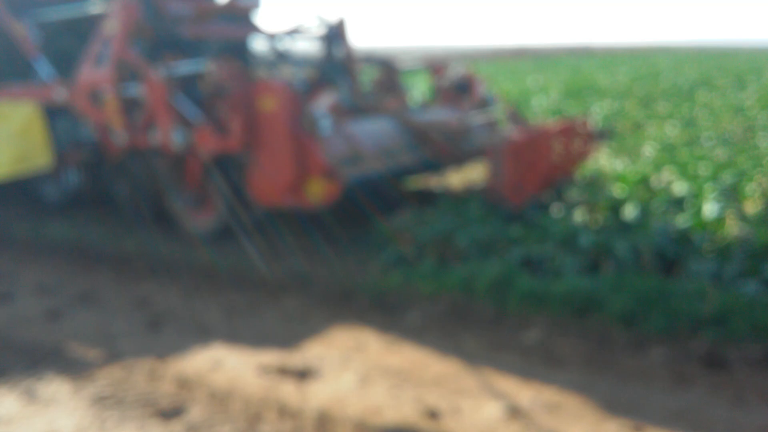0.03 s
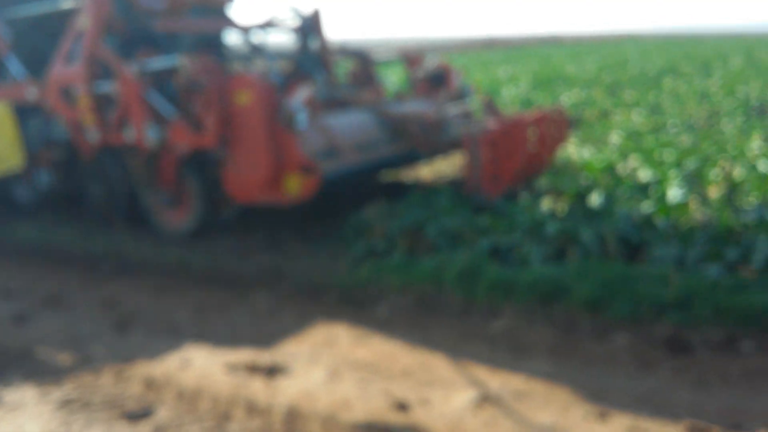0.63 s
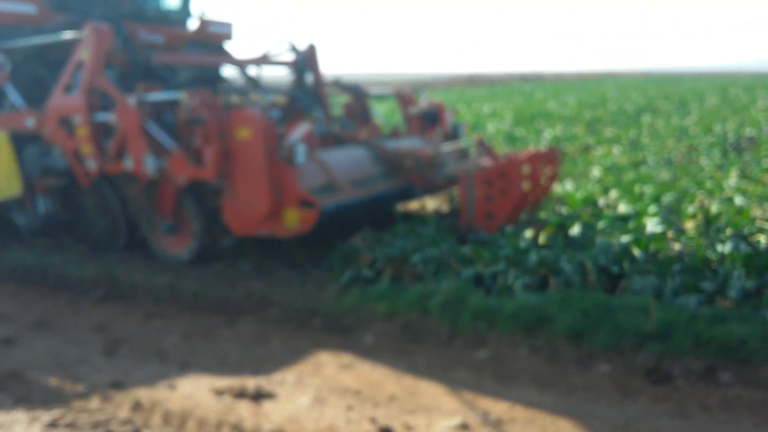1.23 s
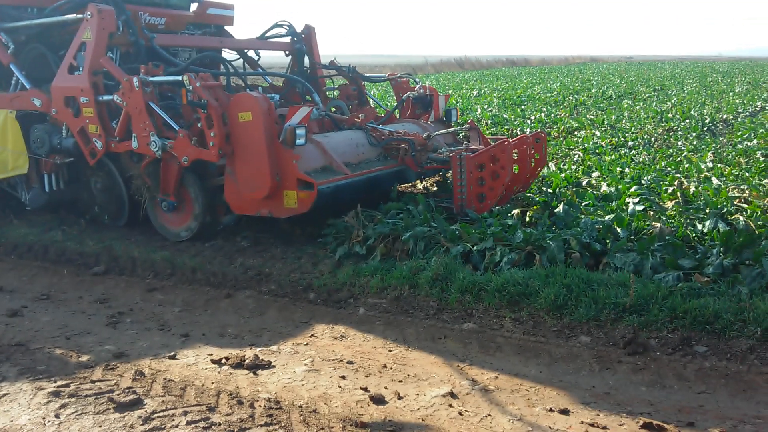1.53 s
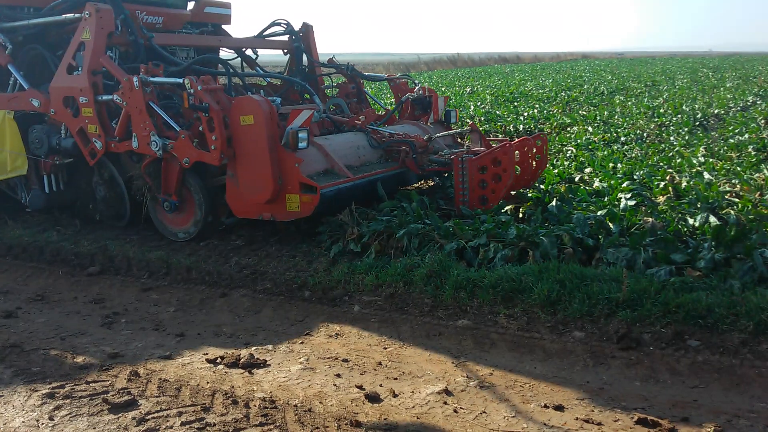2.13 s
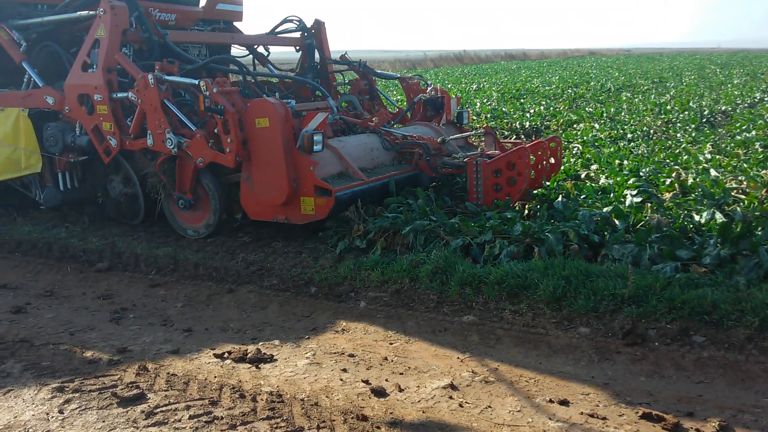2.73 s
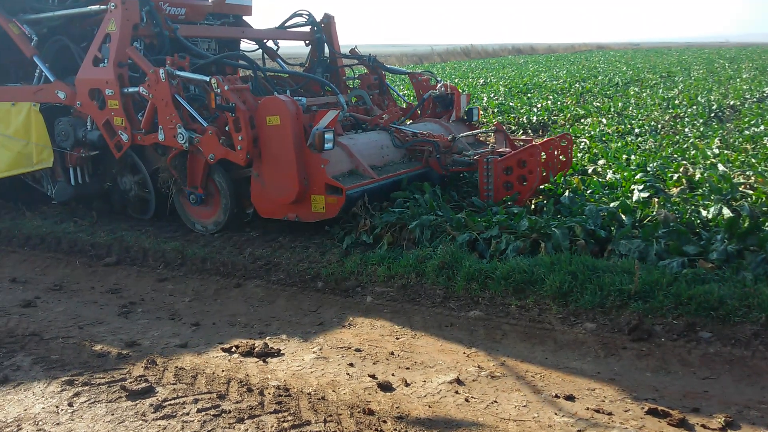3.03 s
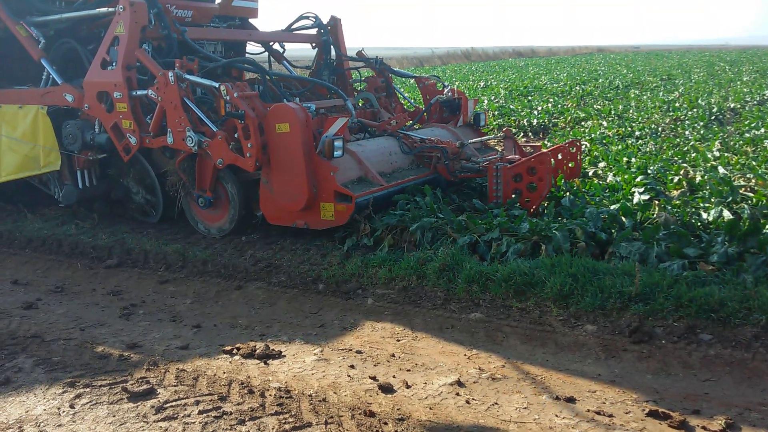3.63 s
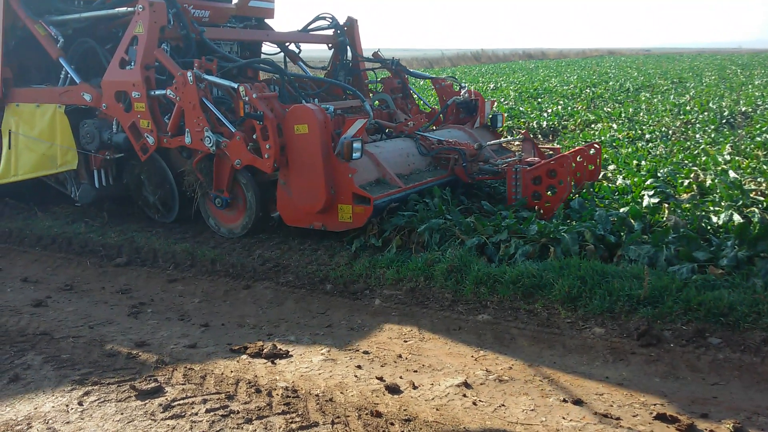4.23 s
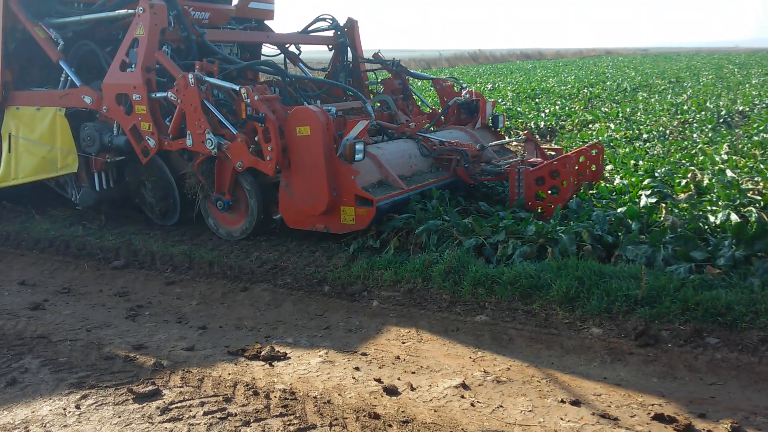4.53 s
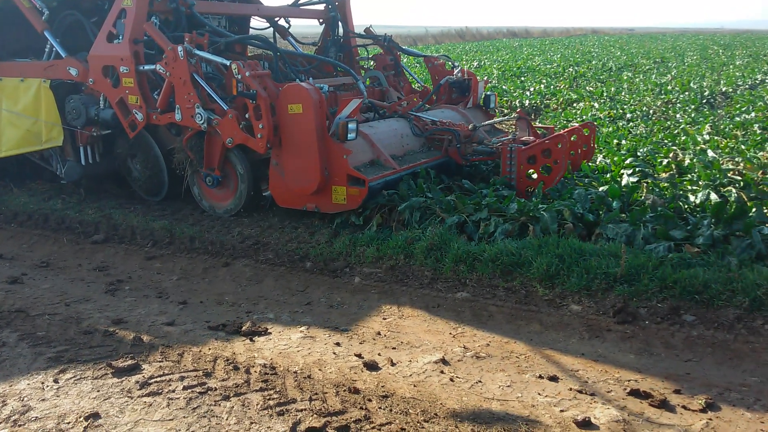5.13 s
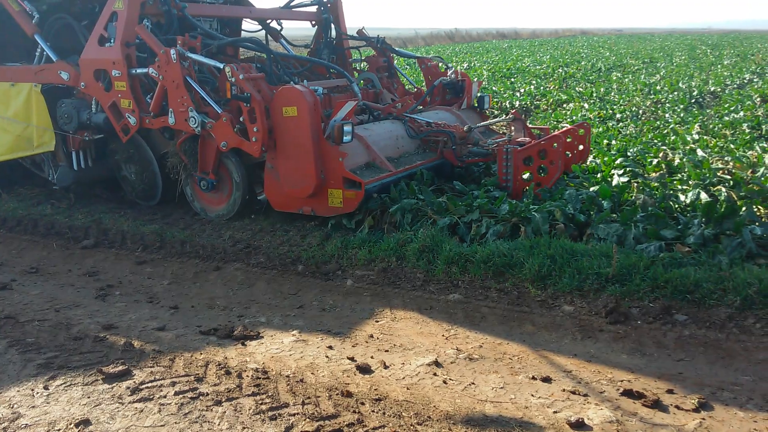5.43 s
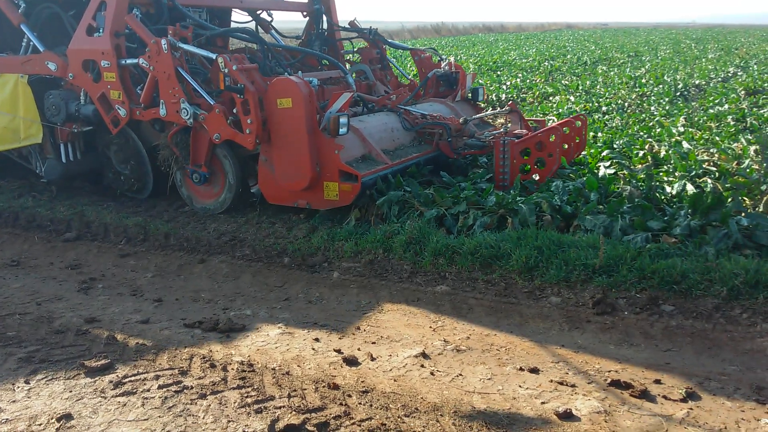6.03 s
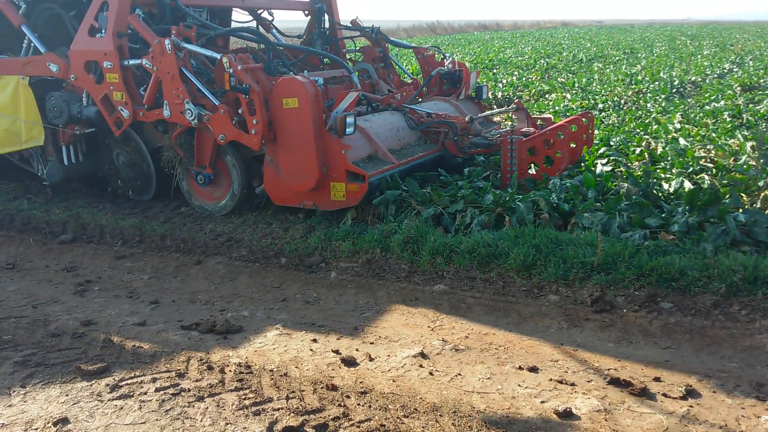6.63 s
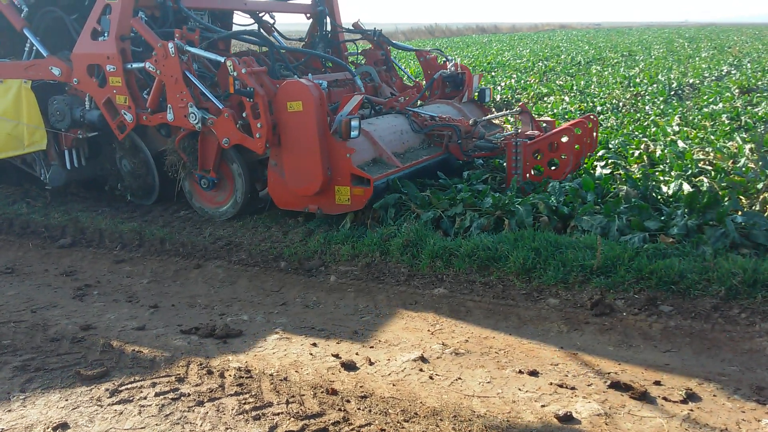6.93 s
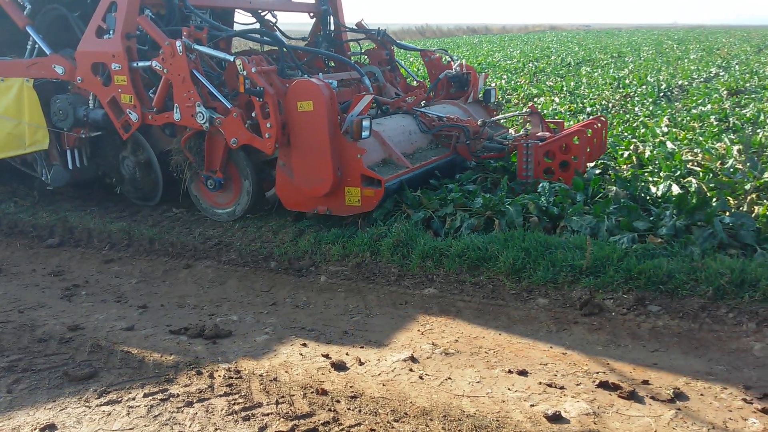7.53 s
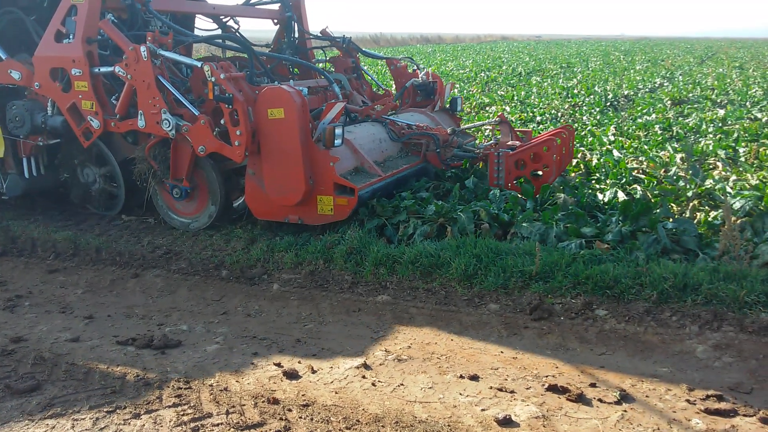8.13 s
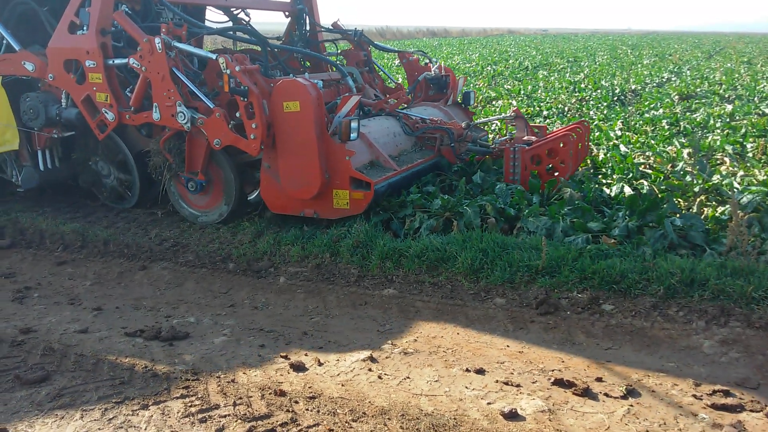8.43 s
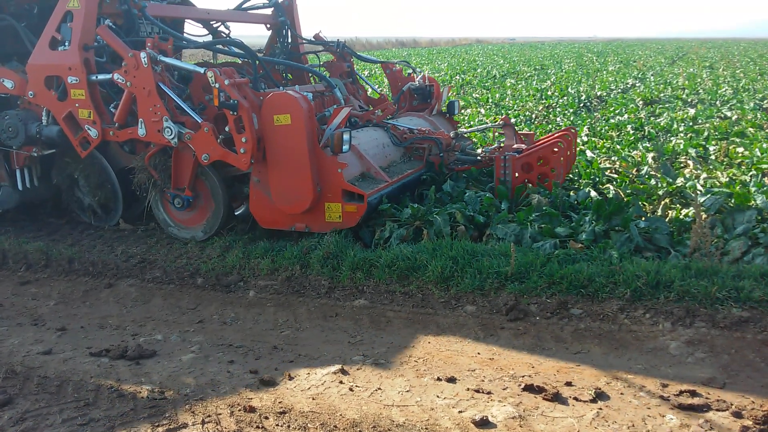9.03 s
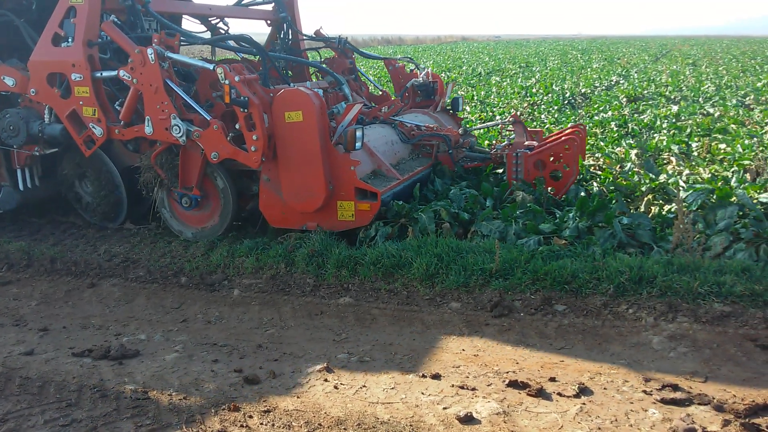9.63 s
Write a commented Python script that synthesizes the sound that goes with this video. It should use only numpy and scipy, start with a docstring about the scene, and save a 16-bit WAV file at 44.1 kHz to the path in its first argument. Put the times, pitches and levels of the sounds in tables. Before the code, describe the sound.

At about 0.4 seconds the microphone clicks once, and a beet harvester a few metres away fades up in two steps, reaching full level near 2 seconds. Its diesel engine and leaf rotor drone steadily over a deep rumble of steel panels, with rattling chains, a hydraulic whine and a fan whine that swells and fades. A faint, thin bearing squeal sinks slightly and ends by 2.5 seconds. Light metal clinks dot the first five seconds. One stone clanks just after the click, and a gritty cluster follows from 2 to 3.3 seconds, with more between 5 and 6 and between 7 and 8. From about 2 seconds, tumbling beets and hissing soil and leaves build in surges, strongest near 5.5, 7.4 and 9.3 seconds. The machine runs on until the end, near 10 seconds. Nearly everything is on the left; the right side is very faint.

```python
"""Beet harvester at the field's edge

A harvester creeps along a few metres away, fading up over the first two seconds. Its six-cylinder
diesel, leaf rotor, fan and hydraulic pump hum over the rumble of the steel body; chains rattle and
a dry bearing sings briefly. Stones clank on the lifting gear, then more and more beets, soil and
leaves pour through it and load the drives. The microphone clicks once at the start, and its right
side is nearly dead."""
import sys
import numpy as np
from scipy import signal
from scipy.fft import rfft, irfft, next_fast_len
from scipy.io import wavfile
from scipy.ndimage import uniform_filter1d

SR = 44100
rng = np.random.default_rng(int(sys.argv[2]) if len(sys.argv) > 2 else 0)


def to_wav(s):
    """Save 16-bit WAV."""
    ch = np.atleast_2d(s).T  # columns
    pcm = np.round(np.clip(ch, -1, 1) * 32767)  # PCM
    wavfile.write(sys.argv[1], SR, pcm.astype(np.int16))


N = 431738
TIME = np.arange(N) / SR
SIZE = next_fast_len(N, real=True)
FREQ = np.maximum(np.fft.rfftfreq(SIZE, 1 / SR), 1)

# surges of crop: t/s, tumbling beets level/dB, soil and leaf spray level/dB
CROP_SURGES = [(1.7, -46.5, -57.5), (2.4, -46, -56), (2.7, -45.5, -51.5), (3.1, -44.5, -50),
               (3.35, -47, -53.5), (3.72, -44.5, -47), (4.1, -42, -47), (4.25, -41, -43.5),
               (4.38, -44, -49), (5.05, -43.5, -47), (5.4, -37.5, -44), (5.65, -38, -43.5),
               (6.3, -41, -43.5), (6.8, -42.5, -47), (7.25, -39.5, -45), (7.43, -36, -40.5),
               (7.7, -37.5, -41.5), (7.95, -40.5, -44), (8.21, -38.5, -40), (8.35, -41, -45),
               (8.8, -39, -44), (9.1, -39.5, -43), (9.31, -35, -41.5), (9.79, -38.5, -42)]
# tone colour of a hard knock on steel: f/Hz, level/dB
CLANK_COLOUR = [(600, -20), (1400, 9.5), (2300, 5), (3300, 2), (4100, 7), (5000, 5.5), (6500, -17.5),
                (9000, -14)]


def undb(db):
    """Decibels to gain."""
    return 10 ** (np.asarray(db) / 20)


def unit(x):
    """Scale to rms 1."""
    return x / np.sqrt(np.mean(x ** 2))


def curves(rows):
    """Each column of a timed table as an automation curve, sample by sample."""
    times, *columns = np.transpose(rows)
    return [np.interp(TIME, times, column) for column in columns]


def response(points):
    """Gain at every frequency from points of f/Hz, level/dB."""
    hz, db = np.transpose(points)
    return undb(np.interp(np.log(FREQ), np.log(hz), db))


def filtered(x, gain):
    """Apply a gain at every frequency."""
    return irfft(rfft(x, SIZE) * gain, SIZE)[..., :N]


def colour(x, points):
    """Ring x through a minimum-phase filter of that shape; rms 1."""
    cepstrum = irfft(np.log(response(points)), SIZE)
    cepstrum[1:SIZE // 2] *= 2
    cepstrum[SIZE // 2 + 1:] = 0
    return unit(filtered(x, np.exp(rfft(cepstrum))))


def walk(rate_hz):
    """Smooth random drift, rolling off above rate_hz; rms 1."""
    return unit(filtered(rng.standard_normal(N), 1 / (1 + (FREQ / rate_hz) ** 4)))


def grains(per_s, spread_db, channels=1):
    """Randomly timed impacts with a spread of sizes, one stream per channel."""
    hit = rng.random((channels, N)) < per_s / SR
    sign, size = rng.standard_normal((2, channels, N))
    return unit(hit * np.sign(sign) * undb(spread_db * np.clip(size, -2, 2)))


def strike(start_s, attack_s, decay_s):
    """Envelope of one blow."""
    envelope = np.zeros(N)
    start = int(start_s * SR)
    age = TIME[:min(SR // 4, N - start)]
    envelope[start:start + len(age)] = (1 - np.exp(-age / attack_s)) * np.exp(-age / decay_s)
    return envelope


def turns(hz, wander):
    """Phase of a shaft or tone whose rate wavers by the fraction wander."""
    return 2 * np.pi * np.cumsum(hz * (1 + wander * walk(1.95))) / SR


def tones(phase, orders, load, flutter_db, flutter_hz):
    """Harmonics of a shaft; each shifts in level with the load and flutters on its own."""
    hum = np.zeros(N)
    for harmonic, empty_db, loaded_db in orders:
        db = empty_db + load * (loaded_db - empty_db) + flutter_db * walk(flutter_hz)
        hum += undb(db) * np.sqrt(2) * np.sin(harmonic * phase + 2 * np.pi * rng.random())
    return hum


def fullness(empty_db=-46, full_db=-39):
    """How full the rollers are, 0 to 1, following the level of the beets."""
    beets_db, _ = curves(CROP_SURGES)
    return np.clip((beets_db - empty_db) / (full_db - empty_db), 0, 1)


def diesel(load, firing_hz=82.5):
    """The cylinders fire in a steady, low drone."""
    # harmonic of the firing rate, empty level/dB, loaded level/dB
    orders = [(1, -38, -39), (2, -33.5, -33), (3, -51, -62), (4, -55, -52)]
    return tones(turns(firing_hz, wander=0.00079), orders, load, flutter_db=0.8, flutter_hz=16)


def leaf_rotor(rotor_phase, load):
    """The spinning flails hum on two harmonics of their shaft."""
    # harmonic of the shaft rate, empty level/dB, loaded level/dB
    orders = [(2, -35.5, -32), (5, -36.5, -41.5)]
    return tones(rotor_phase, orders, load, flutter_db=1.66, flutter_hz=10)


def body_rumble(level_db=-26, swell_db=0.55):
    """Dense knocks shake the steel panels into a deep rumble."""
    # tone colour of the panels: f/Hz, level/dB
    panel_colour = [(15, -44.5), (25, -40), (43, -30), (69, -7), (86, -1.5), (118, -2), (166, -3),
                    (254, -3), (352, -16.5), (400, -31.5), (520, -41), (880, -120)]
    panels = colour(grains(per_s=3000, spread_db=3.5)[0], panel_colour)
    return undb(level_db + swell_db * walk(9)) * panels


def fan(load, waver_db=1.0):
    """The blade tone of the cooling fan gives way under load; its octave whines and swells."""
    # whine, an octave above the blade rate: t/s, f/Hz, level/dB
    whine_path = [(.6, 760, -48), (1.1, 750.4, -43), (1.8, 759, -42.5), (2.44, 755.4, -49),
                  (3.14, 753, -44), (3.7, 757, -51), (4.4, 756.5, -44.5), (4.95, 755, -49.5),
                  (5.4, 758.4, -44), (5.9, 754, -42), (6.15, 754, -46), (6.55, 758, -51), (7.55, 750, -43),
                  (7.85, 752, -50.5), (8.2, 751, -41.5), (8.41, 753, -53.5), (8.73, 749, -37),
                  (9.09, 747, -56), (9.43, 752, -38), (9.79, 752, -48)]
    # harmonic of the blade rate, empty level/dB, loaded level/dB
    orders = [(1, -48, -56)]
    hz, db = curves(whine_path)
    blade_phase = turns(hz / 2, wander=0.00063)
    whine = undb(db + waver_db * walk(7.6)) * np.sqrt(2) * np.sin(2 * blade_phase)
    return whine + tones(blade_phase, orders, load, flutter_db=-1.0, flutter_hz=9.5)


def pump(load, hose_hz=880, hose_width_hz=8.3, hose_db=6.5):
    """Hydraulic whine: the lowest tone comes out under load, the highest swells at a hose resonance."""
    # piston rate: t/s, f/Hz
    piston_rate = [(.5, 218.2), (1.6, 217.5), (2.5, 219.8), (3.3, 217.9), (4.2, 219.6), (5.2, 217.6),
                   (6.3, 218.2), (9.79, 217.6)]
    # harmonic of the piston rate, empty level/dB, loaded level/dB
    orders = [(2, -55.5, -42.5), (3, -47.5, -55), (4, -54, -59.5)]
    hz, = curves(piston_rate)
    phase = turns(hz, wander=0.001402)
    whine = np.zeros(N)
    for order in orders:
        detuning = 2 * (order[0] * hz - hose_hz) / hose_width_hz
        resonance = undb(hose_db / (1 + detuning ** 2))
        whine += resonance * tones(phase, [order], load ** 2, flutter_db=1.0, flutter_hz=8.2)
    return whine


def bearing(waver_db=0.5, whistle_hz=10530, whistle_db=-76):
    """A dry bearing's thin, rough squeal wavers and sinks under a faint, steady whistle."""
    # squeal: t/s, f/Hz, level/dB
    squeal_path = [(.5, 6820, -75), (.7, 6780, -68), (1.05, 6700, -75), (1.7, 6560, -68), (2.4, 6360, -68),
                   (2.6, 6380, -88)]
    hz, db = curves(squeal_path)
    squeal = undb(db + waver_db * walk(9)) * walk(200) * np.sin(turns(hz, wander=0.0073))
    whistle = undb(whistle_db) * walk(120) * np.sin(turns(whistle_hz, wander=0.0026))
    return np.sqrt(2) * (squeal + whistle)


def chain_rattle(load, empty_db=-39.5, loaded_db=-38.5, flutter_db=1.18):
    """Chains and gears rattle, a little harder under load."""
    # tone colour of the drive train: f/Hz, level/dB
    rattle_colour = [(220, -18.5), (380, -10.5), (405, -6), (608, -4), (668, -7.5), (700, -7.5),
                     (768, -8.5), (818, -9), (885, -12.5), (927, -12), (1190, -34), (1460, -20),
                     (3240, -37.5), (6660, -47), (16000, -48)]
    db = empty_db + load * (loaded_db - empty_db) + flutter_db * walk(19)
    return undb(db) * colour(grains(per_s=12000, spread_db=0, channels=2), rattle_colour)


def steel_ring(impacts):
    """Impacts ring the rollers and guide bars; the overall level stays the same."""
    # modes: f/Hz, width/Hz, level/dB relative to the dry impact
    steel_modes = [(1343, 106, 5.5), (1870, 250, -1), (2347, 67, -1), (2782, 430, -3.5), (3880, 220, -1.5),
                   (4150, 130, -5), (4730, 390, -11)]
    ringing = sum(undb(db) / (1 + 2j * (FREQ - hz) / width) for hz, width, db in steel_modes)
    return impacts.std() * unit(filtered(impacts, 1 + ringing))


def crop(rotor_phase, knock_s=0.0045, knock_db=-14):
    """Beets tumble and knock on the rollers, soil and leaves spray; the flow pulses with the rotor."""
    # tone colour of tumbling beets: f/Hz, level/dB
    beet_colour = [(300, -25), (480, 15), (700, 2.5), (1050, 1.5), (1320, -1.5), (1600, -5.5), (1850, -4.5),
                   (2200, -16), (2800, -18.5), (3400, -19), (6000, -41)]
    # tone colour of flying soil and leaves: f/Hz, level/dB
    spray_colour = [(1500, -12.5), (2750, -7.5), (3100, -7), (3500, -12.5), (3900, -3.5), (4150, -3),
                    (4500, -4), (4900, -3), (6000, -8), (8600, -14), (10500, -8.5), (13000, -5.5),
                    (16000, -10)]
    beets_db, spray_db = curves(CROP_SURGES)
    tumble = colour(grains(per_s=1500, spread_db=1.5, channels=2), beet_colour)
    # single knocks, each a short burst of noise, come out as the rollers fill
    hits = np.abs(grains(per_s=60, spread_db=0.5))
    blows = signal.lfilter([1], [1, -np.exp(-1 / (knock_s * SR))], hits)
    knocks = colour(blows * rng.standard_normal((2, N)), CLANK_COLOUR)
    beets = steel_ring(tumble + fullness() * undb(knock_db) * knocks)
    spray = steel_ring(colour(grains(per_s=7000, spread_db=-0.5, channels=2), spray_colour))
    flicker = undb(0.96 * walk(18.5) + 0.89 * walk(83))
    pulse = 1 + 0.043 * np.sin(rotor_phase)
    return flicker * pulse * (undb(beets_db) * beets + undb(spray_db) * spray)


def mic_click(start_s=0.4257, step_db=-20, low_hz=70, high_hz=9000):
    """An electrical step in the microphone, which its bass filter turns into a snap and a low swing."""
    step = undb(step_db) * (TIME > start_s)
    swing = signal.sosfilt(signal.butter(4, low_hz, "highpass", fs=SR, output="sos"), step)
    return signal.sosfilt(signal.butter(1, high_hz, fs=SR, output="sos"), swing)


def stones(attack_s=0.00047, grit_stretch=2.3):
    """Each stone or clod clanks on the lifting gear and bursts into grit that outlasts the clank."""
    # impacts: t/s, clank level/dB, grit level/dB, clank decay/s
    hits = [(0.549, -27.5, -46, .0024), (1.732, -48, -50, .009), (1.96, -43, -46, .006),
            (1.972, -42, -49, 0.011), (1.993, -39, -49.5, 0.024), (2.032, -46, -55, 0.022),
            (2.131, -42.5, -53, 0.021), (2.491, -32.5, -44.5, 0.021), (2.554, -46, -48, .011),
            (2.608, -36.5, -50, 0.0097), (2.66, -40, -53, .008), (2.847, -40.5, -45, .01),
            (2.904, -43, -48, .014), (3.073, -28.5, -43, 0.0053), (3.116, -38.5, -51, .009),
            (3.161, -45, -49, 0.0048), (3.261, -40, -45.5, 0.024), (3.321, -36, -42, 0.0045),
            (5.18, -34, -45, 0.016), (5.771, -38, -45, .004), (7.151, -32, -49, .003),
            (7.242, -32.5, -53, 0.0047), (7.317, -33, -47, .003), (7.715, -33, -53, 0.013)]
    # tone colour of the grit: f/Hz, level/dB
    grit_colour = [(3000, -28), (5000, 7), (8500, -0.5), (12500, 6), (16000, 0.5)]
    clank_envelope = sum(undb(db) * strike(t, attack_s, decay) for t, db, _, decay in hits)
    grit_envelope = sum(undb(db) * strike(t, attack_s, grit_stretch * decay) for t, _, db, decay in hits)
    clanks = clank_envelope * colour(rng.standard_normal((2, N)), CLANK_COLOUR)
    grit = grit_envelope * colour(grains(per_s=4000, spread_db=3.5, channels=2), grit_colour)
    return steel_ring(clanks) + grit


def clinks(ring_hz=4950, attack_s=0.0016, decay_s=0.0071):
    """Loose steel parts touch and ring briefly in a cluster of close tones."""
    # light touches: t/s, level/dB
    touches = [(0.8325, -42), (1.5249, -43), (1.8865, -45), (2.1394, -44), (2.2742, -47), (3.6611, -39),
               (4.35, -38), (4.4303, -41), (4.9443, -39)]
    envelope = sum(undb(db) * strike(t, attack_s, decay_s) for t, db in touches)
    return envelope * walk(220) * np.sin(2 * np.pi * ring_hz * TIME)


def weak_side(near, scattered, port_hz=1900, port_width_hz=70, port_db=7, scatter_hz=1100, lag_s=0.00018):
    """The right port hears faintly and late, rings at one pitch and gets its treble by other paths."""
    # loss against the left side: f/Hz, loss/dB
    side_loss = [(60, 32.5), (250, 30), (400, 27), (700, 20.5), (1150, 12), (1400, 16), (1750, 18),
                 (2300, 12.5), (3300, 18), (4100, 24.5), (5000, 25.5), (6700, 15), (9000, 20.5),
                 (14000, 14)]
    resonance = 1 + (undb(port_db) - 1) / (1 + (2 * (FREQ - port_hz) / port_width_hz) ** 2)
    gain = resonance / response(side_loss) * np.exp(-2j * np.pi * FREQ * lag_s)
    shared = 1 / (1 + (FREQ / scatter_hz) ** 2)
    return filtered(near, gain * np.sqrt(shared)) + filtered(scattered, gain * np.sqrt(1 - shared))


def scene(rotor_hz=44.45, load_smoothing_s=1.5, clatter_fade_depth=1.05, mic_db=5.5):
    """The flow of crop loads the drives; the whole machine fades up, almost wholly on the left."""
    # two-step fade-in, silent before its first point: t/s, level/dB
    fade_in = [(.36, -37.5), (.5, -21), (.66, -13.5), (1.22, -14), (1.5, -5.5), (1.8, 1), (2.9, 0)]
    fade_db, = curves(fade_in)
    load = uniform_filter1d(fullness(), int(load_smoothing_s * SR))
    rotor_phase = turns(rotor_hz, wander=0.0011)
    drone = diesel(load) + leaf_rotor(rotor_phase, load) + body_rumble()
    machine = undb(fade_db) * (drone + fan(load) + pump(load) + bearing() + clinks())
    impacts = chain_rattle(load) + crop(rotor_phase) + stones()
    clatter, scattered = undb(clatter_fade_depth * fade_db) * impacts
    mic_gain = undb(mic_db) * (TIME > fade_in[0][0])
    near = mic_gain * (machine + clatter)
    return np.array([near + mic_gain * mic_click(), weak_side(near, mic_gain * scattered)])


def record(dry):
    """A steep low-pass cuts the top above 15.9 kHz."""
    return signal.sosfilt(signal.ellip(10, .2, 70, 15900, fs=SR, output="sos"), dry)


dry = scene()
out = record(dry)
to_wav(out)
```